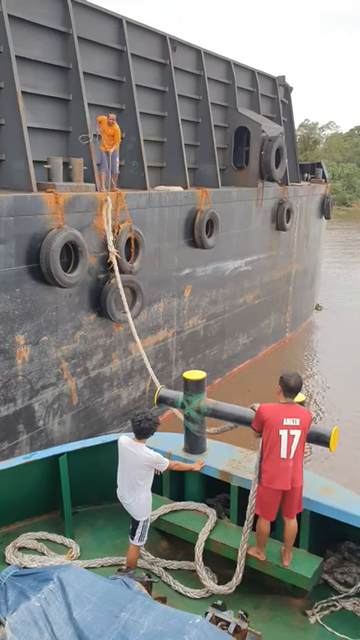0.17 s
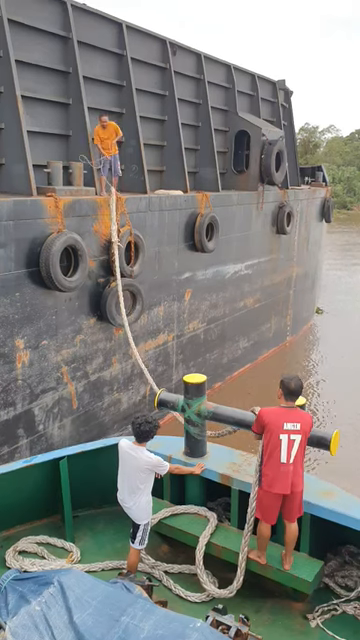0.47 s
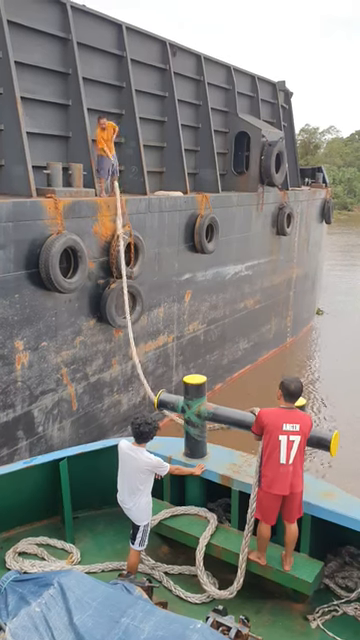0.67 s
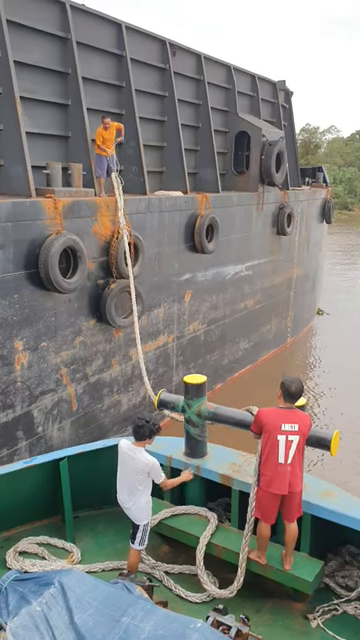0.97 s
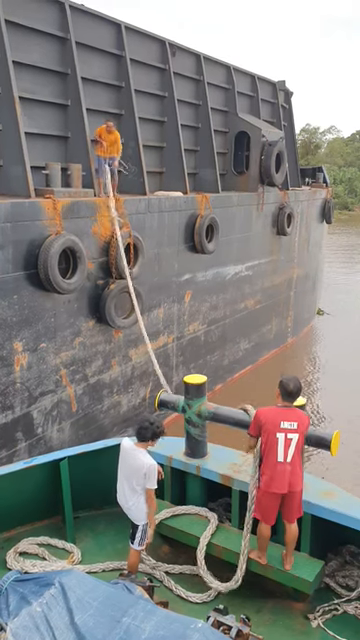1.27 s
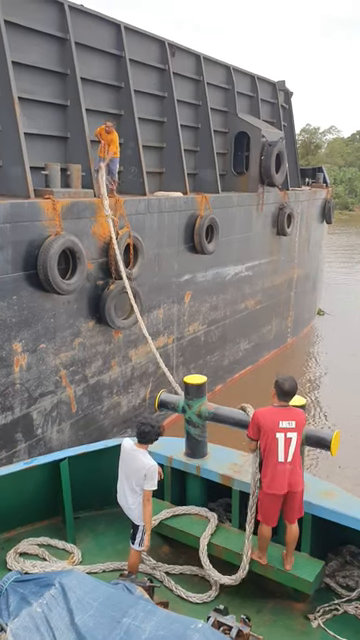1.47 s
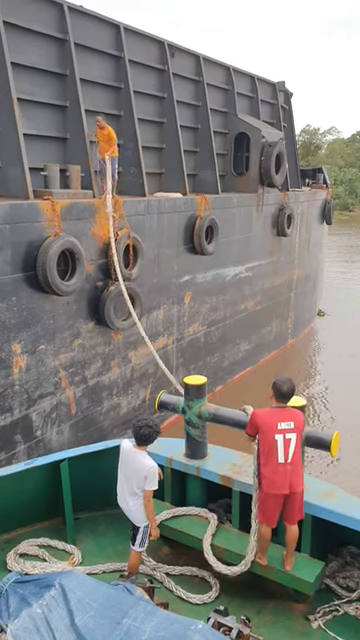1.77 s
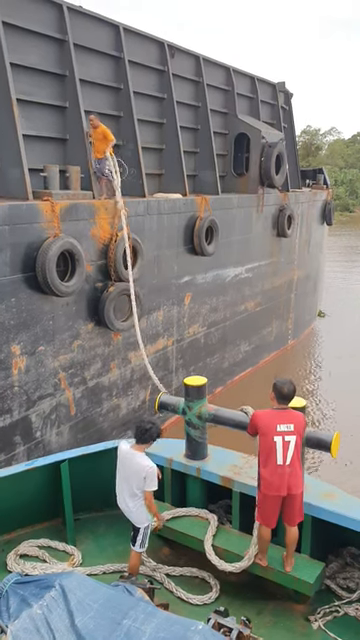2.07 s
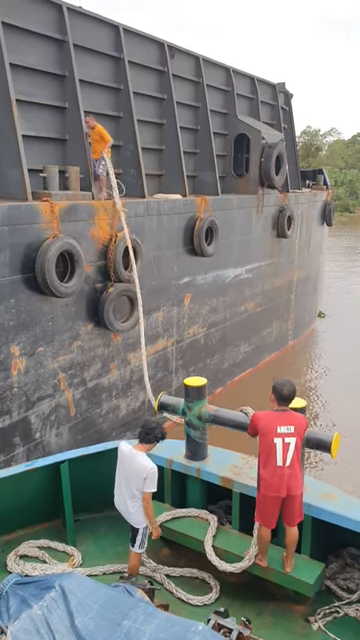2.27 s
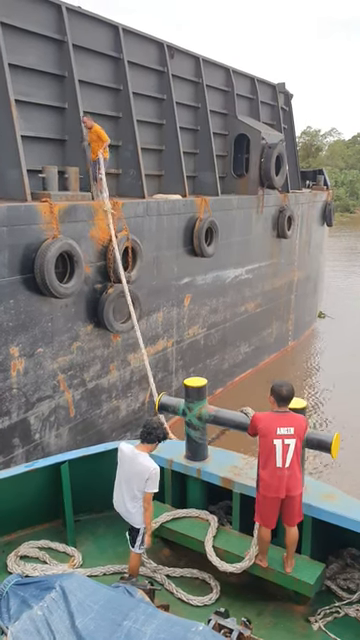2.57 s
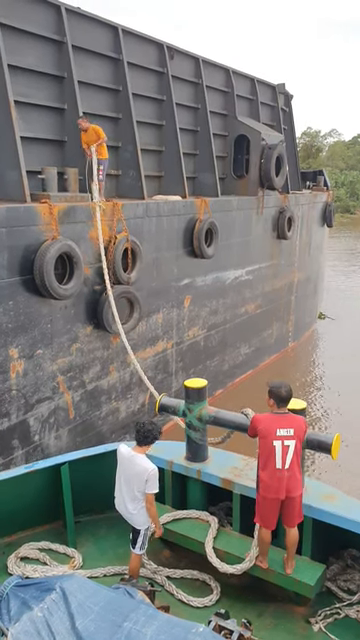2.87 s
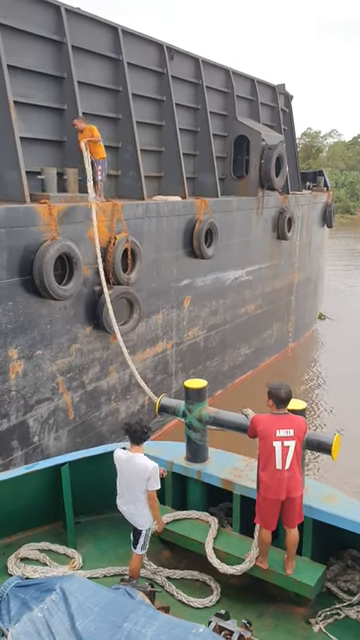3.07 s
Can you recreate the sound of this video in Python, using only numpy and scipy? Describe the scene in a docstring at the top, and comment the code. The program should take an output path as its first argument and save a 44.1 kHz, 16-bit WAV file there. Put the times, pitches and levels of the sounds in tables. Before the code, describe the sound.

Low, pulsing diesel engine rumble runs throughout, picked up by a phone on a river tugboat's deck. A generator hums and rattles over a soft wash of water, and later three small splashes follow, each fainter and higher.

```python
"""On the foredeck of a river tug, heard through a phone's two microphone ports. After a short silence,
two slow six-cylinder diesels are idling slightly out of step, so their exhaust throb beats; each drives
a humming gear. All along, a generator drones and rattles over a faint whine, engine-room roar and water
hissing along the hull. In the second half come three small splashes, each softer and higher in pitch."""
import sys
import numpy as np
from scipy import signal
from scipy.fft import rfft, irfft, next_fast_len
from scipy.io import wavfile
from scipy.ndimage import uniform_filter1d, map_coordinates

SR = 44100
rng = np.random.default_rng(int(sys.argv[2]) if len(sys.argv) > 2 else 0)


def put_to_file(sound):
    """Save the sound as 16-bit audio at rate SR, in the file named by the first command-line argument."""
    columns = np.atleast_2d(sound).T  # one column per channel
    safe = np.clip(columns, -1, 1)
    whole_steps = np.round(safe * 32767)
    wavfile.write(sys.argv[1], SR, whole_steps.astype(np.int16))


N = 141561
TURNS_PER_CYCLE = 2  # a four-stroke engine fires each cylinder once in two turns


def main_engines():
    """Two diesels fire six times a cycle and turn gears. One is steady; the other hunts (drifts)."""
    # Each row: time in seconds, turns per minute.
    steady_rpm = [(0, 574.52), (3.3, 574.52)]
    hunting_rpm = [(.1, 549.56), (.5, 558.43), (.9, 561.46), (1.3, 559.08), (2, 556.49), (2.5, 556.6),
                   (3.2, 559.55)]
    # Each exhaust tone: vibrations per engine cycle, base level in dB.
    steady_tones = {6: -45, 9: -46, 10: -47, 11: -48, 12: -31, 13: -49, 16: -44, 18: -35, 19: -47, 21: -49,
                    24: -40, 26: -48, 30: -49, 42: -55, 48: -56, 60: -59, 84: -58}
    hunting_tones = {6: -49, 8: -49, 9: -47, 10: -49, 12: -27, 14: -51, 18: -38, 22: -53, 24: -47}
    # Each row: time in seconds, gain of the hunting engine's exhaust in dB.
    hunting_load = [(.1, -10), (.3, -1), (.55, 3.5), (.9, 2), (1.3, 0), (1.8, 2), (2.3, 0), (2.8, -2.5),
                    (3.2, -1.5)]
    # Each row: time in seconds, gear hum of the steady and of the hunting engine in dB.
    gear_levels = [(.1, -43, -47), (.4, -47, -49), (.9, -46, -43), (1.2, -47, -48), (1.5, -43.5, -50),
                   (1.8, -42, -49), (2.2, -45, -48), (2.7, -45.5, -48), (3.2, -45, -50)]
    steady_crank, hunting_crank = .13, .0883  # how far into its cycle each engine starts
    exhaust = tones(steady_rpm, steady_tones, steady_crank, shift=.08)
    load_gain = amp(curves(hunting_load)[0])
    exhaust += load_gain * tones(hunting_rpm, hunting_tones, hunting_crank, shift=.3)
    gear_multiple = 96
    steady_db, hunting_db = curves(gear_levels)
    gears = tones(steady_rpm, {gear_multiple: steady_db}, steady_crank, shift=.36, echo_s=0)
    gears += tones(hunting_rpm, {gear_multiple: hunting_db}, hunting_crank, shift=.76, echo_s=0)
    return exhaust + gears


def generator():
    """A faster engine gives strong tones, a high drone that swells, and a rattle."""
    # Each row: time in seconds, turns per minute.
    rpm = [(0, 1500.66), (3.3, 1500.66)]
    # Each tone: vibrations per engine cycle, base level in dB.
    tone_levels = {4: -38, 8: -42, 11: -45, 12: -54, 17: -54, 19: -50, 20: -52, 21: -50, 22: -55, 23: -55,
                   28: -54, 29: -56, 33: -57, 40: -52, 100: -62, 104: -61, 108: -62}
    # Each row: time in seconds, level of the high drone in dB.
    drone_levels = [(.1, -63), (1, -62), (1.2, -57), (1.55, -58), (1.75, -53), (2.1, -55), (2.85, -55),
                    (3.2, -61)]
    drone_multiple = 96
    levels = {**tone_levels, drone_multiple: curves(drone_levels)[0]}
    return rattle(rpm) + tones(rpm, levels, crank=.1325, shift=.68)


def rattle(rpm):
    """The generator's rattle repeats every engine cycle and is different at each port."""
    # Each row: pitch in Hz, base level in dB of each rattle tone near it.
    spectrum = [(500, -58.5), (800, -70), (1300, -66), (1700, -73), (2300, -91.5), (3400, -83.5)]
    firing_boost_db, scatter_db = 4, 2.5
    multiples = np.arange(41, 280)
    shape = (2, len(multiples))
    cycle_hz = rpm[0][1] / (60 * TURNS_PER_CYCLE)
    db = along(spectrum, multiples * cycle_hz) + firing_boost_db * (multiples % 4 == 0)
    db = db + scatter_db * rng.standard_normal(shape)
    steps = 4096  # build one cycle this long, then loop it
    partials = np.zeros((2, steps // 2 + 1), complex)
    partials[:, multiples] = amp(db) * np.exp(2j * np.pi * rng.random(shape)) * steps / np.sqrt(2)
    position = cycles(rpm) % 1 * steps
    return np.array([map_coordinates(loop, [position], mode="grid-wrap")
                     for loop in irfft(partials, steps)])


def roar():
    """Noise with no pitch: the exhaust rumbles and roars, and the engine room clatters."""
    # Each row: frequency in Hz, base level in dB per Hz.
    rumble_spectrum = [(15, -81), (28, -66), (40, -54), (55, -54), (70, -54), (90, -51), (105, -54),
                       (125, -57), (190, -61), (260, -85), (400, -140)]
    roar_spectrum = [(110, -90), (150, -66), (200, -61), (250, -62), (320, -65), (400, -66), (460, -68),
                     (520, -67), (700, -77), (1000, -106.5)]
    clatter_spectrum = [(400, -85.5), (700, -73.5), (1000, -75.5), (1300, -73), (1500, -78), (1900, -79),
                        (2500, -85), (4000, -91.5), (6000, -110)]
    # Each row: time in seconds, rumble gain in dB.
    rumble_swell = [(.1, 3), (.55, 4), (.7, 1), (1.1, -1), (1.5, -2.5), (1.9, -2), (2.2, 0), (2.7, 0),
                    (3.2, 0)]
    # Each row: time in seconds, roar gain in dB, clatter gain in dB.
    roar_swell = [(.1, -0.5, 2.5), (.55, -2, 3.5), (.9, -0.5, 3), (1.4, -1.5, 2), (1.8, 0, 1.5),
                  (2.2, -1.5, 2.5), (2.7, 1.5, 2), (3.2, -4.5, 2)]
    roar_db, clatter_db = curves(roar_swell)
    rumble = rush(rumble_spectrum, patchy_db=1.5) * amp(curves(rumble_swell)[0])
    exhaust = rush(roar_spectrum, patchy_db=1.3) * amp(roar_db)
    clatter = rush(clatter_spectrum, patchy_db=1.56) * amp(clatter_db + 0.31 * wobble(5.95))
    return rumble + exhaust + clatter


def water():
    """Water runs along the hull: a deeper wash, a hiss and fine spray, each swelling slowly."""
    # Each row: frequency in Hz, base level in dB per Hz.
    wash_spectrum = [(1500, -100), (2100, -94.5), (2800, -88.5), (3300, -95.5), (3800, -112), (5000, -140)]
    hiss_spectrum = [(3000, -105), (4200, -93.5), (5800, -91), (7200, -99), (8500, -112)]
    spray_spectrum = [(6000, -120), (8300, -107), (10000, -106), (12000, -102), (14000, -104),
                      (15200, -106)]
    # Each row: time in seconds, then the gains of wash, hiss and spray in dB.
    swell = [(.1, 3, 3, -15), (.3, 2, 1.5, -10), (.8, 5, 2, -4), (1.1, -5, 2.5, -1), (1.4, 3.5, 2.5, -1),
             (2.1, 3.5, 3, -1.5), (2.6, -5, 2, -2), (3.2, -1, 3, -2.5)]
    wash_db, hiss_db, spray_db = curves(swell)
    wash = rush(wash_spectrum, patchy_db=1.5) * amp(wash_db)
    hiss = rush(hiss_spectrum, patchy_db=0.8) * amp(hiss_db)
    spray = rush(spray_spectrum, patchy_db=3.0) * amp(spray_db + 0.81 * wobble(20))
    return wash + hiss + spray


def splashes():
    """Each small splash is a burst of high noise that rises fast and dies away."""
    # Each row: start in seconds, level in dB, centre pitch in Hz.
    bursts = [(1.828, -43.5, 5400), (2.112, -51, 9500), (2.69, -58, 11000)]
    rise_s, fall_60db_s, log_width = .007, .16, .45
    out = np.zeros((2, N))
    for start_s, db, centre_hz in bursts:
        age = np.maximum(np.arange(N) / SR - start_s, 0)
        noise = rng.standard_normal((2, N))
        spray = filtered(noise, lambda hz: np.exp(-(np.log((hz + 1) / centre_hz) / log_width) ** 2))
        envelope = amp(db - 60 * age / fall_60db_s) * (1 - np.exp(-age / rise_s))
        out += spray / spray.std() * envelope
    return out


def whine():
    """A faint, thin whine that flickers, perhaps a turbocharger."""
    # Each row: time in seconds, base level in dB.
    levels = [(.1, -83.5), (1.9, -67), (2.1, -85), (3.2, -71)]
    pitch_hz, waver_hz = 4268, 3
    phase = 2 * np.pi * np.cumsum(pitch_hz + waver_hz * wobble(10)) / SR
    gain = np.sqrt(2) * amp(curves(levels)[0] + 3.8 * wobble(19))
    return gain * np.array([np.sin(phase), np.cos(phase)])


def tones(rpm, levels, crank, shift, echo_s=.003):
    """Wavering tones locked to an engine; echoes off hull and barge scatter the high ones' timing."""
    shimmer_db, shimmer_rate, port_spread_s = .7, 4, .0005
    run = cycles(rpm) + crank
    cycle_hz = (run[-1] - run[0]) * SR / N
    out = np.zeros((2, N))
    for multiple, db in levels.items():
        hz = multiple * cycle_hz
        scatter = rng.standard_normal() * (hz * echo_s) ** 2
        scatter += rng.standard_normal((2, 1)) * (hz * port_spread_s) ** 2
        gain = np.sqrt(2) * amp(db + shimmer_db * wobble(shimmer_rate))
        # shift slides each tone by a fraction of one vibration
        out += gain * np.cos(2 * np.pi * (multiple * run + shift + scatter))
    return out


def rush(spectrum, patchy_db):
    """Stereo noise shaped by a spectrum, with random louder and softer patches."""
    # Each row: frequency in Hz, how alike left and right are (1 the same, -1 opposite).
    likeness = [(60, 0.99), (110, 0.94), (200, 0.98), (380, 0.95), (700, -0.2), (1290, 0.28), (2380, -0.18),
                (4400, 0.23), (8120, 0.034), (15000, -0.39)]
    slices = signal.stft(rng.standard_normal((2, N)), nperseg=512)[2]
    patches = uniform_filter1d(rng.standard_normal(slices.shape[1:]), size=6, axis=0)
    patches = uniform_filter1d(patches, size=12, axis=1)
    noise = signal.istft(slices * amp(patchy_db * patches / patches.std()), nperseg=512)[1][:, :N]

    def colour(hz):
        angle = np.arccos(np.clip(along(likeness, hz), -1, 1)) / 2
        return np.sqrt(SR / 2) * amp(along(spectrum, hz)) * [np.cos(angle), np.sin(angle)]

    mid, side = filtered(noise, colour)
    return np.array([mid + side, mid - side])


def cycles(rpm):
    """Count the engine cycles run since the start."""
    return np.cumsum(curves(rpm)[0]) / (60 * TURNS_PER_CYCLE * SR)


def amp(db):
    """Turn decibels into a gain."""
    return 10 ** (np.asarray(db) / 20)


def along(points, hz):
    """Read between (Hz, value) points on a log frequency scale."""
    frequencies, values = np.transpose(points)
    return np.interp(np.log(hz + 1), np.log(frequencies + 1), values)


def curves(rows):
    """Give one value per sample for each column after the time."""
    times, *columns = np.transpose(rows)
    return [np.interp(np.arange(N) / SR, times, column) for column in columns]


def wobble(rate):
    """A wandering line through `rate` random points a second."""
    points = rng.standard_normal(int(N * rate / SR) + 4)
    return map_coordinates(points, [np.arange(N) * rate / SR], order=1)


def filtered(x, response):
    """Multiply each frequency in x by response(hz)."""
    size = next_fast_len(N + SR // 2)
    return irfft(rfft(x, size) * response(np.fft.rfftfreq(size, 1 / SR)), size)[..., :N]


def scene():
    """All the machines, their roar and the water, heard together."""
    return main_engines() + generator() + whine() + roar() + water() + splashes()


def record(dry):
    """Each port has its own colour and delay; the phone fades in and cuts the highest treble."""
    # Each row: frequency in Hz, left level minus right level in dB.
    balance = [(60, -1.0), (92, -1.0), (140, -0.5), (210, -2.0), (330, -4.0), (500, -3.5), (770, -3.0),
               (1170, -2.0), (1790, -1.0), (2740, 1.0), (4190, -3.0), (6410, -4.5), (9810, 0.0),
               (15000, -2.5)]
    port_lag_s = 0.000402  # the left port hears the stern later
    start_s, fade_s, top_hz = .1155, .003, 15150
    side = np.array([[.5], [-.5]])

    def port_response(hz):
        return amp(side * along(balance, hz)) * np.exp(-2j * np.pi * hz * port_lag_s * side)

    fade_in = np.clip((np.arange(N) / SR - start_s) / fade_s, 0, 1)
    return filtered(filtered(dry, port_response) * fade_in, lambda hz: hz < top_hz)


dry = scene()
out = record(dry)
put_to_file(out)
```